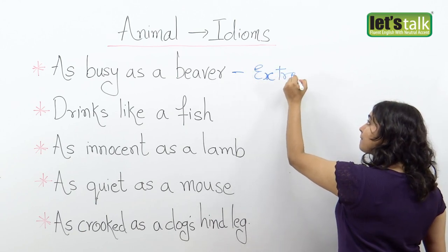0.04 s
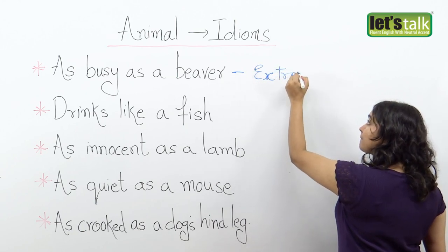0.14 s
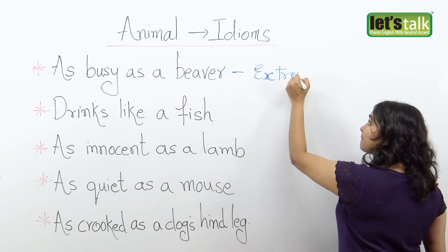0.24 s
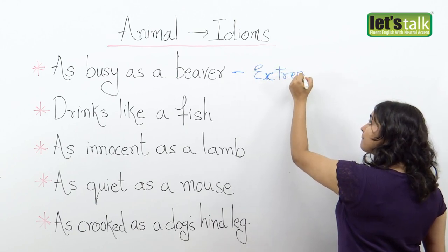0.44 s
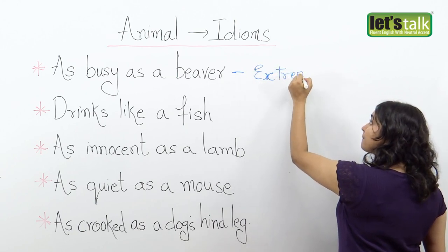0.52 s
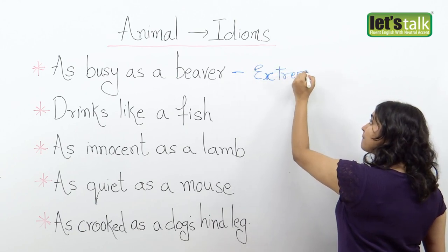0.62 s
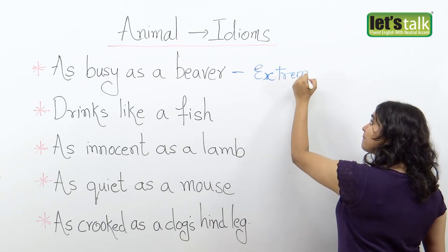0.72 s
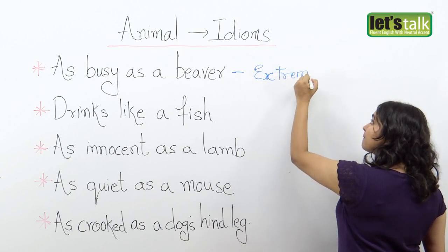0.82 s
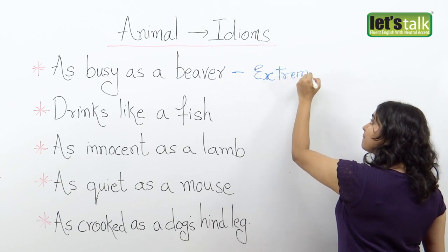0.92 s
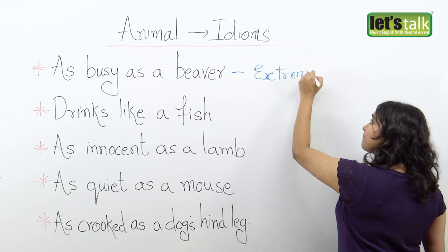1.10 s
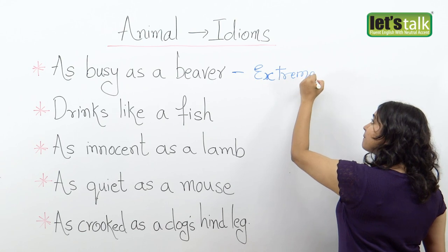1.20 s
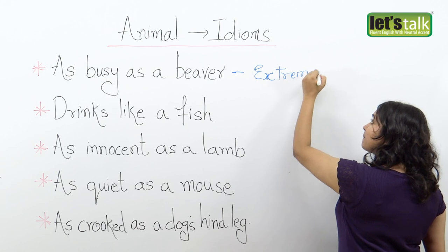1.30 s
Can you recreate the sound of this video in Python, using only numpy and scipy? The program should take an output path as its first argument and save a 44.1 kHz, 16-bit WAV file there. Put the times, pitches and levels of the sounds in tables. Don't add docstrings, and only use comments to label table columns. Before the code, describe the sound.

A marker writes on a whiteboard. A scratchy stroke already under way fades by 0.15 s; a firm, hollow thump lands at 0.25 s, followed by a quick short stroke and a longer winding one. A very soft tap at 0.63 s starts a long uneven rub until 0.9 s. Another firm thump at 0.99 s leads to louder, hissier strokes until 1.35 s. Low air noise and fan hum continue throughout.

```python
import sys
import numpy as np
from scipy import signal
from scipy.io import wavfile
from scipy.ndimage import uniform_filter1d

SR = 44100
rng = np.random.default_rng(int(sys.argv[2]) if len(sys.argv) > 2 else 0)


def wrap_up_sound(samples):
    columns = np.atleast_2d(samples).T
    tamed = np.clip(columns, -1, 1)
    steps = np.round(tamed * 32767).astype(np.int16)
    wavfile.write(sys.argv[1], SR, steps)


def gain_from_db(level_db):
    decades = np.asarray(level_db, float) / 20
    return 10 ** decades


N = 59535


def evened(x):
    return x / np.sqrt(np.mean(x ** 2) + 1e-20)


def drifting(x, size, axis=-1):
    return uniform_filter1d(uniform_filter1d(x, size=size, axis=axis), size=size, axis=axis)


def resonate(x, hz, width_hz):
    turn = np.exp(2j * np.pi * np.cumsum(hz * np.ones(len(x))) / SR)
    r = np.exp(-np.pi * width_hz / SR)
    low = signal.lfilter([1 - r], [1, -r], x / turn)
    low = signal.lfilter([1 - r], [1, -r], low)
    return evened((turn * low).real)


def coloured(x, points, patch_db=0.):
    hz, _, z = signal.stft(x, SR, nperseg=1024, noverlap=896)
    point_hz, point_db = np.transpose(points)
    curve_db = np.interp(np.log(hz + 1), np.log(point_hz + 1), point_db)
    patches = drifting(rng.standard_normal(z.shape), 14, axis=0)
    patches = evened(drifting(patches, 14, axis=1))
    z = z * gain_from_db(curve_db[:, None] + patch_db * patches)
    return evened(signal.istft(z, SR, nperseg=1024, noverlap=896)[1][:N])


def strokes():
    # (time [s], nib speed [dB], nib resonance [Hz],
    # barrel pressure [dB], tip hiss [dB])
    first_run = [
        [(0.0, -59.5, 7300, 2, -5), (0.042, -61.5, 7550, -0.5, 1.5), (0.078, -57.5, 6300, -4, -2),
         (0.124, -59.5, 6300, -11, -7), (0.144, -72.5, 6690, -2, 4.5), (0.154, -67, 6720, -11, -17),
         (0.17, -79, 6730, -20, 0)],
        [(0.255, -74.5, 7000, 0, -2), (0.265, -85, 6970, 5, -8), (0.281, -61.5, 7060, 3.5, -5),
         (0.309, -59.5, 7960, -5, 0), (0.327, -61, 8050, 2, 1), (0.365, -78.5, 6800, 8, -1)],
        [(0.37, -75, 7600, -3, -10), (0.382, -58, 8000, -15, 0.5), (0.398, -61, 8200, -4.5, 0.5),
         (0.458, -58.5, 7040, -5, -1.5), (0.518, -59, 6360, -2, -8), (0.584, -64, 7700, 2, 3),
         (0.615, -75, 6970, 0, -2)],
    ]
    second_run = [
        [(0.616, -77, 7700, 4, -4), (0.624, -61, 8100, -3, -0.5), (0.718, -55.5, 7100, -5, -3),
         (0.75, -60, 6340, 0, -5), (0.824, -56, 7900, -4, -5.5), (0.844, -62.5, 7810, 1.5, -5),
         (0.904, -74, 6540, -5, -6), (0.92, -74.5, 6290, 1, -4)],
        [(1.01, -84, 7180, -11, 5), (1.022, -67, 7400, 5, -2), (1.034, -74, 7440, 4, -8),
         (1.054, -52.5, 6900, -12.5, -16), (1.08, -51, 6940, -15, -15), (1.135, -62, 7000, 3.5, -12)],
        [(1.136, -57.5, 6000, -0.5, -7), (1.17, -56, 6760, -8, -7), (1.204, -57, 7360, -5.5, -6),
         (1.258, -52.5, 6000, -9, -9), (1.306, -54, 6270, -11.5, -14), (1.338, -67.5, 6700, -3, -23),
         (1.35, -69, 6660, -3, -4.5)],
    ]
    # (frequency [Hz], width [Hz], level [dB])
    barrel_modes = [(2500, 330, -9.5), (3800, 445, 0), (4380, 220, -5.5), (4914, 350, -7)]
    # (frequency [Hz], width [Hz], level [dB])
    fibre_modes = [(12970, 1600, -9), (8570, 810, -9.5), (5830, 2000, -23)]
    # (frequency [Hz], level per Hz [dB])
    fizz_spectrum = [(880, -8), (1500, -26), (3090, 1), (3760, -15), (4140, 5.5), (9050, 9), (10300, 9.5),
                     (15500, 1)]
    slips_per_s, slip_spread_db = 9000, 1

    s, speed_db, nib_hz, press_db, tip_db = np.concatenate(list(first_run) + list(second_run)).T
    t = np.arange(N) / SR
    speed = gain_from_db(np.interp(t, s, speed_db))
    press = gain_from_db(np.interp(t, s, press_db))

    slips = (rng.random(N) < slips_per_s / SR) * rng.standard_normal(N)
    slips = slips * gain_from_db(slip_spread_db * rng.exponential(1, N))
    slips = coloured(slips, [(20, 0), (20000, 0.0044)], patch_db=1.6)

    barrel = sum(gain_from_db(db) * resonate(slips, hz, width) for hz, width, db in barrel_modes)
    fibre = 0
    for k, (hz, width, db) in enumerate(fibre_modes):
        fibre = fibre + (-1) ** k * gain_from_db(db) * resonate(slips, hz, width)
    tip = gain_from_db(np.interp(t, s, tip_db) - 2.5) * resonate(slips, 10250.0, 1400.0)
    nib = resonate(slips, np.interp(t, s, nib_hz), 2180)
    fizz = gain_from_db(-4.5) * coloured(rng.standard_normal(N), fizz_spectrum, patch_db=-2.5)
    rubbing = speed * (gain_from_db(-2.0) * press * barrel + gain_from_db(-5) * (fibre + nib) + tip + fizz)
    return rubbing + catches(slips, t) + drag(t)


def catches(slips, t):
    # (time [s], length [s], frequency [Hz], level [dB])
    moments = [(0.064, 0.098, 3720, -64.5), (.232, 0.01, 3730, -68), (0.328, 0.035, 4420, -67),
               (0.399, 0.052, 3800, -60.5), (0.45, 0.068, 2600, -68.5), (.492, 0.029, 2610, -59.5),
               (0.575, 0.043, 4380, -61), (0.589, 0.03, 2500, -65), (0.722, 0.074, 2500, -68),
               (0.812, 0.065, 4370, -62), (0.817, 0.081, 9700, -61.5), (1.084, 0.055, 2500, -66.5),
               (1.268, 0.2, 5380, -62), (0.02, 0.076, 2500, -71), (1.283, 0.24, 2520, -75),
               (0.495, .08, 6150, -70), (.71, 0.043, 7400, -69), (1.21, .06, 12900, -71),
               (1.04, .03, 1480, -63.5), (1.26, 0.1, 10060, -63)]
    q = 8.5
    out = np.zeros(N)
    for s, length, hz, db in moments:
        swell = np.exp(-2 * ((t - s) / length * 2) ** 2)
        out += gain_from_db(db) * swell * resonate(slips, hz, hz / q)
    return out


def drag(t):
    # (time [s], rocking level [dB])
    lean = [(0, -57.5), (.1, -59), (.2, -60), (.3, -40.5), (.43, -49.5), (.53, -59), (.58, -68), (.66, -64),
            (.73, -72), (.77, -68), (.82, -59), (.9, -78), (1.02, -41), (1.14, -62), (1.2, -85),
            (1.27, -60), (1.35, -52)]
    rocking = gain_from_db(np.interp(t, *np.transpose(lean)))
    return rocking * resonate(rng.standard_normal(N), 69.9, 43)


def ring(t, modes, rise_s, lead_s=0.):
    swell = np.sin(np.pi / 2 * np.clip((t + lead_s) / rise_s, 0, 1)) ** 2
    return swell * sum(gain_from_db(db - 60 * abs(t) / t60) * np.cos(2 * np.pi * hz * t) for hz, db, t60 in modes)


def taps():
    landing_s = [.2456, .6254, .9876]
    # (blow [dB], panel ring [dB], sway [dB], tick [dB])
    levels = [
        (-16, -28.5, -34.5, -41.5),
        (-38, -48.5, -41, -47),
        (-19, -31.5, -33.5, -55),
    ]
    # (frequency [Hz], level [dB], T60 [s])
    panel = [(133, -13, 0.43), (187, -3.5, 0.26), (214.4, 0.5, 0.209), (229.2, -4, 0.21),
             (260.2, -1.5, 0.23), (297.6, -6.5, 0.24), (359.7, 0.5, .13), (408, -21.5, 0.46),
             (483, -23, 0.29), (545, -19, 0.16), (632, -18.5, 0.102), (658, -31.5, 0.08)]
    # (frequency [Hz], level [dB], T60 [s])
    mounts = [
        (86.3, 3.5, 0.28),
        (67.15, -5, 0.68),
    ]
    blow_lead_s, blow_len_s, blow_hz = 0.0056, 0.0104, 275
    tick = [(667, None, 0.012)]

    out = np.zeros(N)
    for s, (blow_db, ring_db, sway_db, tick_db) in zip(landing_s, levels):
        t = np.arange(N) / SR - s
        push = np.sin(np.pi * np.clip((t + blow_lead_s) / blow_len_s, 0, 1)) ** 2
        tick = [(667, tick_db, 0.012)]
        out += ring(t + 0.00327, tick, 0.0014, 0.0019)
        out += gain_from_db(blow_db) * push * np.cos(2 * np.pi * blow_hz * t)
        out += gain_from_db(ring_db) * ring(t, panel, rise_s=0.0053, lead_s=-0.001)
        out += gain_from_db(sway_db) * ring(t, mounts, rise_s=0.004, lead_s=-0.004)
    return out + room_tail(out)


def room_tail(x):
    level_db, t60_s, top_hz = -9, 0.29, 550
    t = np.arange(SR // 2) / SR
    tail = rng.standard_normal(len(t)) * gain_from_db(-60 * t / t60_s) * (t > 0.008)
    tail = signal.lfilter(*signal.butter(2, top_hz, fs=SR), tail / np.linalg.norm(tail))
    return gain_from_db(level_db) * signal.fftconvolve(x, tail)[:N]


def room():
    # (frequency [Hz], level per Hz [dB])
    air_spectrum = [(12, -37), (20, 11.5), (196, -8), (297, -14.5), (415, -8), (491, -16.5), (833, -14.5),
                    (906, -16.5), (15500, -45)]
    # (frequency [Hz], level [dB], width [Hz])
    ducts = [(201.4, -69.5, 10), (140.1, -64.5, 16), (307, -67.5, 8.4), (40, -74, 2.7)]
    fan_hz, fan_db, waver_db = 282, -59.5, 2.5
    hum = sum(gain_from_db(db) * resonate(rng.standard_normal(N), hz, width) for hz, db, width in ducts)
    waver = evened(drifting(rng.standard_normal(N), 2500))
    fan = gain_from_db(fan_db + waver_db * waver) * np.sin(2 * np.pi * fan_hz * np.arange(N) / SR)
    air = gain_from_db(-54.5) * coloured(rng.standard_normal(N), air_spectrum, patch_db=1.18)
    return air + hum + fan


def scene():
    return (taps() + strokes() + room())[None]


def band_limit(x):
    return signal.sosfilt(signal.butter(12, 15630, fs=SR, output="sos"), x)


def record(dry):
    roll_off = signal.butter(N=8, Wn=15350, fs=SR, output="sos")
    mix = signal.sosfilt(roll_off, dry)
    return band_limit(mix)


dry = scene()
out = record(dry)
wrap_up_sound(out)
```